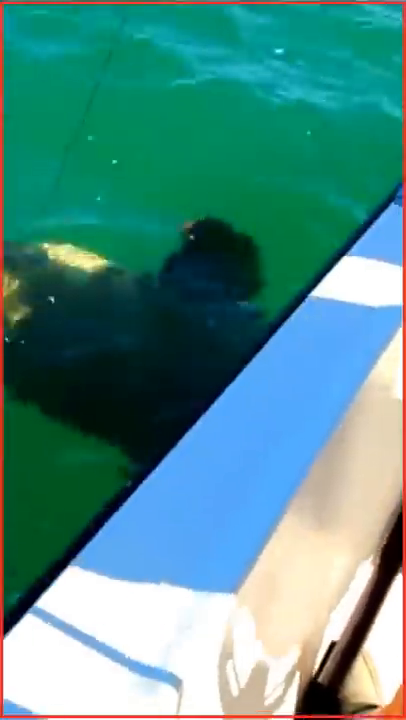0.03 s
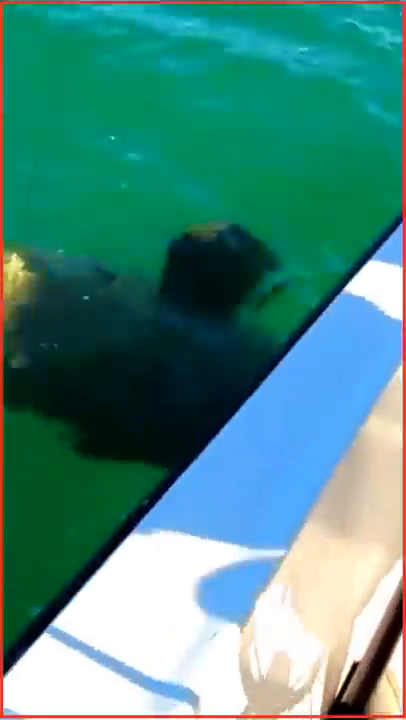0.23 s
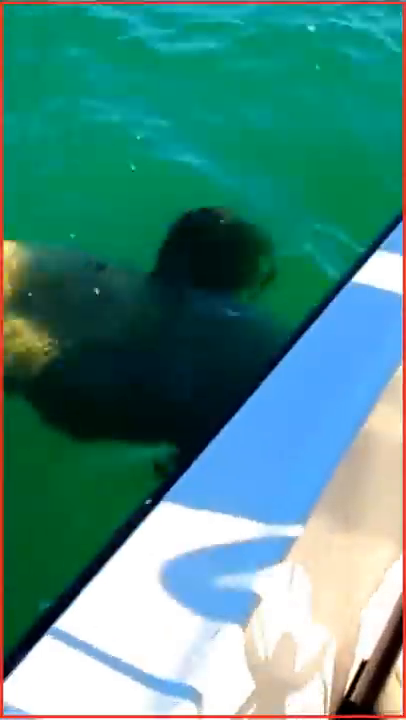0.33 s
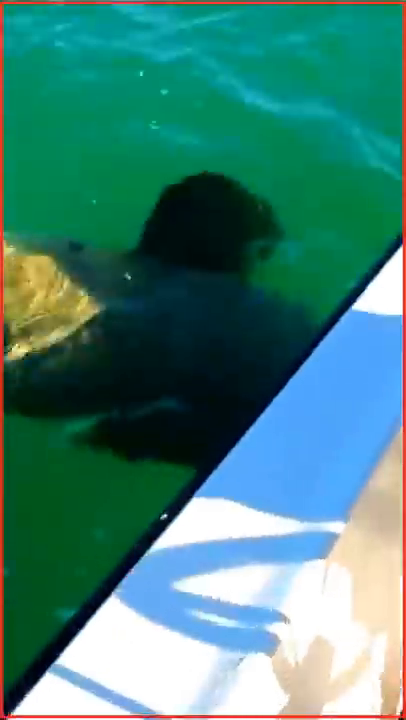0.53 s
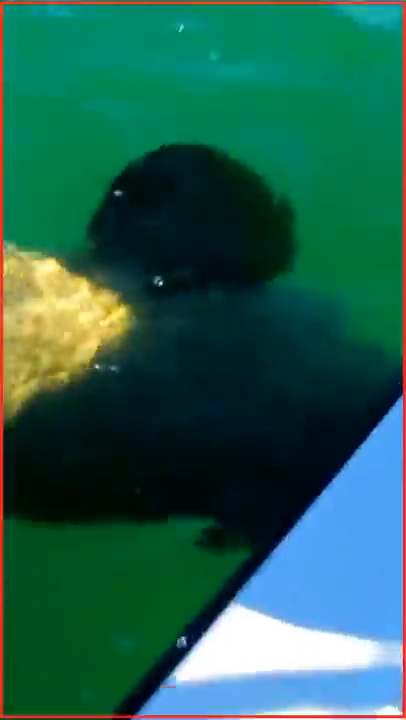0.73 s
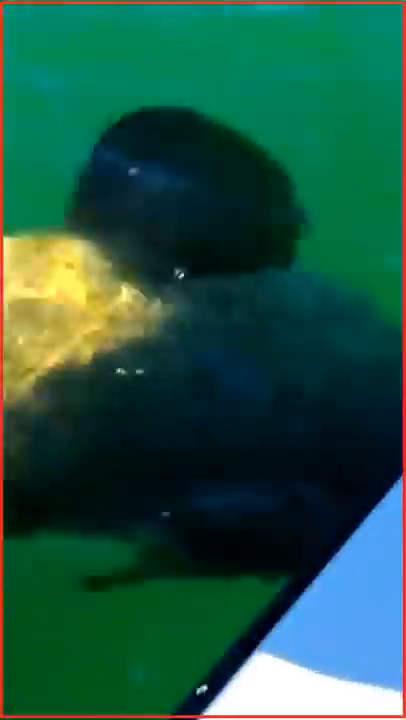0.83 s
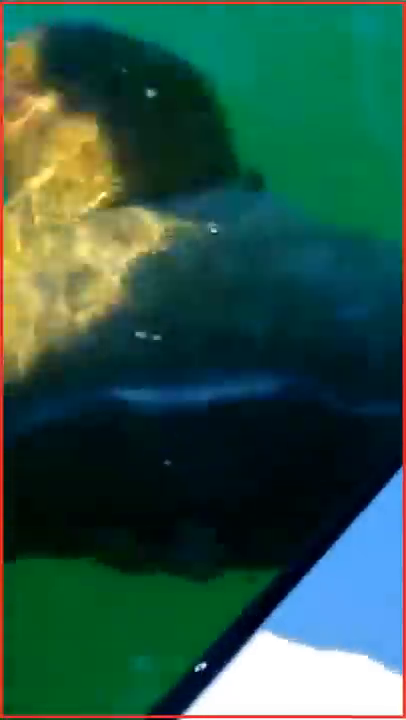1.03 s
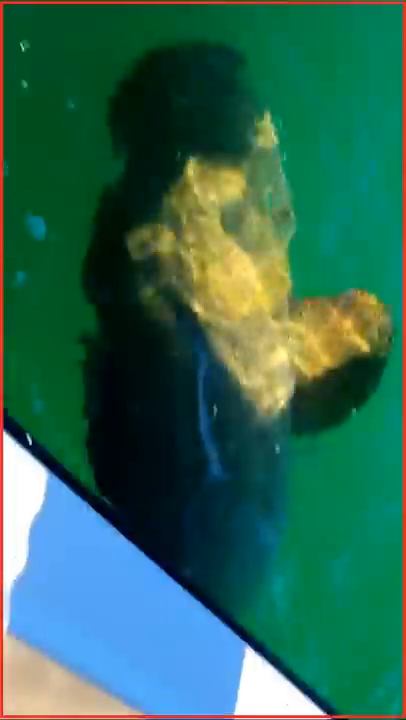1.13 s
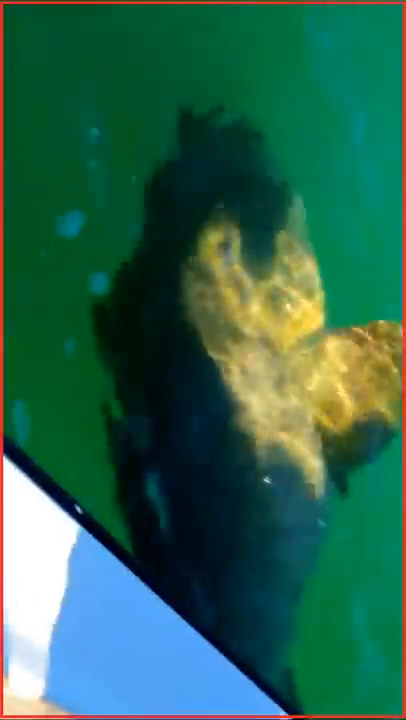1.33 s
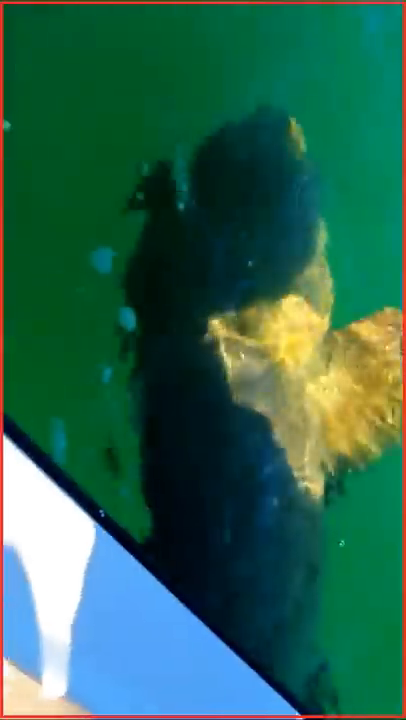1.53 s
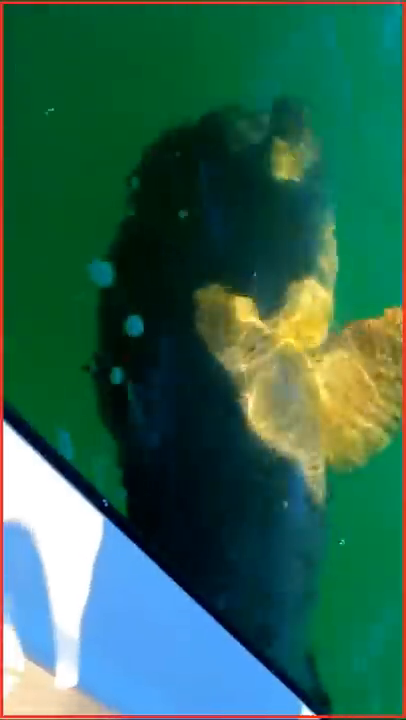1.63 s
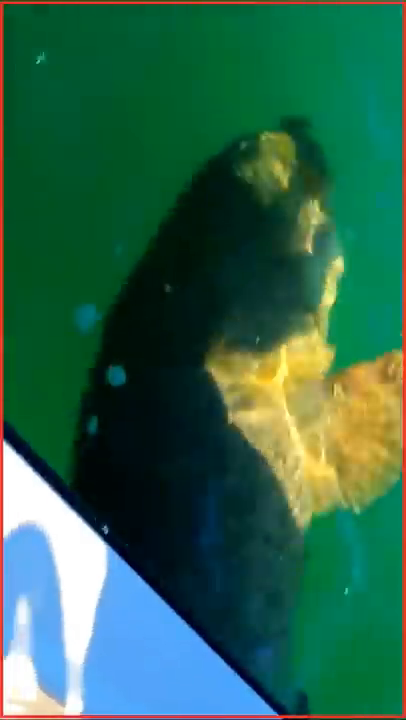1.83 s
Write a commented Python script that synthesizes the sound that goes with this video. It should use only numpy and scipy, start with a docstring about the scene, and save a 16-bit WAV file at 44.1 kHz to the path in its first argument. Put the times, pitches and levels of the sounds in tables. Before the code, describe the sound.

Two hard, hollow knocks hit a small boat's hull at about 0.25 and 0.4 seconds, loud and close, the second leaving a brief boom. Lighter bumps follow until 0.8 seconds. Faint ratchet-like ticks run from 0.1 to 0.9 seconds, slowing. After that come soft low thumps, quiet water laps around 1 to 1.2 seconds and a small click near 1.5, with low wind rumble on the microphone throughout.

```python
"""Two hard bumps boom through a small boat's hollow hull, and lighter bumps follow as the object settles.
Each impact excites the damped modes of the hull, its panels and the enclosed air. Something like a
ratchet ticks and slows, each tick reflected by the deck. Water laps, wind buffets the microphone,
and there are two small snaps. The two hard knocks just overload the recorder."""
import sys
import numpy as np
from scipy import signal
from scipy.fft import rfft, irfft
from scipy.io import wavfile

SR = 44100
rng = np.random.default_rng(int(sys.argv[2]) if len(sys.argv) > 2 else 0)


def store_pcm(level_fs):
    """Save levels as 16-bit WAV."""
    pcm = np.round(np.clip(level_fs, -1, 1) * 32767).astype(np.int16)
    wavfile.write(sys.argv[1], SR, np.atleast_2d(pcm).T)


N = 83790

# Spectrum of the water's wash: f/Hz, spectral level/dB
WASH_SPECTRUM = [(170, -19), (330, -2.5), (700, -1.5), (1400, -9), (2600, -15), (5000, -22), (16000, -33.5)]
# Envelope of the wash: t/s, level/dB
WASH_LEVEL = [(0, -47.5), (.7, -47), (1.2, -47.5), (1.35, -51), (1.45, -55.5), (1.66, -51), (1.9, -55)]
# Envelope of the water's narrow hiss: t/s, level/dB
HISS_LEVEL = [(0, -60.5), (.7, -73), (1.02, -52), (1.22, -50), (1.42, -70.5)]
# Laps and their fizz: t/s, level/dB, f/Hz, Gaussian width/s
LAPS = [(0.96, -42.5, 1830, 0.0043), (0.998, -34, 266, 0.0095), (1.155, -35.5, 610, 0.015),
        (1.164, -40, 860, 0.0087), (1.177, -38.5, 330, 0.014), (1.331, -58.5, 11300, .012),
        (1.736, -44, 1280, 0.003)]
# Spectrum of wind on the microphone: f/Hz, spectral level/dB
WIND_SPECTRUM = [(20, -5), (110, -1), (200, -5.5), (400, -13.5), (3000, -110)]
# Envelope of the wind: t/s, level/dB
WIND_LEVEL = [(0, -43.5), (.17, -55), (.5, -39.5), (.8, -51.5), (1.1, -39), (1.45, -50.5), (1.9, -54)]
# Wind buffets and soft shoves on the hull: t/s, level/dB, f/Hz, Gaussian width/s
THUMPS = [(0.07, -35, 62, 0.01), (.259, -16.5, 147, 0.0074), (.301, -29.5, 174, 0.01),
          (0.993, -23, 190, 0.0015), (1.004, -29, 171, 0.0074), (1.07, -36, 94, 0.013),
          (1.142, -35.5, 195, 0.0079), (1.18, -37.5, 83.4, 0.019), (1.335, -28, 86, 0.0022),
          (1.539, -34, 116, 0.006), (1.57, -32, 126, 0.0072), (1.712, -38, 109, 0.0038),
          (1.787, -32.5, 142, 0.0035)]
# Small hard clicks: t/s, level/dB
SNAPS = [(1.095, -47.5), (1.471, -35.5)]
# Modes of a snap: f/Hz, level/dB, time constant/s
SNAP_MODES = [(2360, -6, 0.0034), (7470, 3, 0.0015), (10000, 5.5, 0.00071), (14400, -3, 0.0012)]
# Ratchet ticks: t/s, level/dB
TICKS = [(0.11, -29), (0.1526, -29.5), (0.196, -32), (0.2255, -38), (0.3007, -34.5), (0.3284, -33.5),
         (0.3532, -30.5), (.446, -34), (0.4943, -30.5), (0.5285, -30), (0.6882, -34), (0.7558, -33.5),
         (0.8039, -32), (0.8640, -36.5)]
# Spectrum of a tick: f/Hz, spectral level/dB
TICK_SPECTRUM = [(500, -17), (1800, -10.5), (3100, 0), (4300, -7.5), (5800, -3.5), (8500, -10),
                 (10500, -17), (16000, -21)]
# Direct and reflected paths of a tick: delay/s, level/dB
TICK_PATHS = [(0, -4.5), (.0048, -11), (.009, -13), (0.013, -13.5)]
# Hull modes: f/Hz, level struck at spot 0/dB, level struck at spot 1/dB
HULL_MODES = [(124, -11.5, -40), (172.6, -7.5, -19), (198.2, -7.5, 2), (231, -1.5, -12),
              (291.6, -16, -11.5), (350, -7.5, -11), (427.7, -13, -13.5), (512.3, -13, -14.5),
              (560, -13.5, -27), (732, -22.5, -20), (974, -14, -13.5), (1130, -10.5, -36),
              (1374, -14, -18.5), (1787, -55, -19), (1954, -26, -20.5), (2506, -21, -24),
              (2712, -44, -20.5), (2950, -31, -23)]
# Dense ring of the panels: f/Hz, spectral level/dB, T60/s
PANEL_BANDS = [(109, -39, 0.091), (259, 5, 0.11), (530, -0.5, 0.11), (960, -1, 0.065), (1590, -11, 0.083),
               (2600, -12.5, 0.059), (4370, -24, 0.1), (7350, -30.5, 0.11), (15000, -25, 0.047)]
# Lingering resonances of the hull: f/Hz, bandwidth/Hz, level/dB
LINGERING_BANDS = [(129, 15, -6), (276, 45, 0.5), (395, 42, -3.5), (640, 1080, -9)]
# Blows and rebounds: t/s, level/dB, spot (0 to 1), contact cut-off/Hz, crack and panel gain/dB
KNOCKS = [(0.2340, 0.5, 0.066, 7300, -1.5), (0.2458, -25, 0.66, 14400, 15.5), (0.3872, 0, 0.92, 9800, -0.5),
          (0.403, -19, 0.83, 8300, 9.5), (0.488, -25.5, 0.6, 3000, 6), (0.545, -26, 0.68, 2560, 7),
          (0.595, -33, 0.78, 12500, 12), (0.7045, -15, 0.88, 280, -2.5), (0.7714, -18.5, 1, 2300, 2.5)]


def undb(db):
    """Amplitude ratio for a level in decibels."""
    return 10 ** (np.asarray(db) / 20)


def since(start):
    """Time elapsed since an onset, zero before it."""
    return np.maximum(np.arange(N) / SR - start, 0)


def fade(t, t60):
    """Exponential decay, 60 dB in t60 seconds."""
    return np.exp(-np.log(1000) * t / t60)


def burst(t, rise):
    """Critically damped pulse, peaking at 1 when t = rise."""
    return t / rise * np.exp(1 - t / rise)


def swell(centre, width):
    """Gaussian envelope in time."""
    return np.exp(-.5 * ((since(0) - centre) / width) ** 2)


def envelope(rows):
    """Gain interpolated through rows of t/s, level/dB."""
    return undb(np.interp(since(0), *np.array(rows).T))


def on_bins(hz, values):
    """Interpolation in log frequency onto every spectral bin."""
    return np.interp(np.log(np.fft.rfftfreq(N, 1 / SR) + 1), np.log(hz), values)


def noise(gain):
    """White noise filtered by a gain per bin, scaled to unit variance."""
    x = irfft(rfft(rng.standard_normal(N)) * gain, N)
    return x / x.std()


def coloured(rows):
    """Unit noise shaped by rows of f/Hz, level/dB."""
    return noise(undb(on_bins(*np.array(rows).T)))


def resonant(hz, width):
    """Unit noise in one steep-sided resonance."""
    f = np.fft.rfftfreq(N, 1 / SR) + 1
    return noise(1 / (1 + ((f * f - hz * hz) / (f * width)) ** 2))


def wander(rate_hz):
    """Smooth random modulation: low-passed unit noise."""
    return noise(np.exp(-(np.fft.rfftfreq(N, 1 / SR) / rate_hz) ** 2))


def split(x, centres):
    """Complementary filter bank: overlapping bands that sum to the input."""
    spectrum = rfft(x)
    return [irfft(spectrum * on_bins(centres, one), N) for one in np.eye(len(centres))]


def water(flicker_db=2, lap_bandwidth_ratio=0.56):
    """Amplitude-modulated noise bands: a flickering wash, laps against the side and a narrow hiss."""
    octaves = 250 * 2 ** np.arange(6)
    wash = sum(band * undb(flicker_db * wander(52) * min(1, 2000 / hz))
               for hz, band in zip(octaves, split(coloured(WASH_SPECTRUM), octaves)))
    laps = sum(undb(db) * resonant(hz, lap_bandwidth_ratio * hz) * swell(centre, width)
               for centre, db, hz, width in LAPS)
    hiss = resonant(hz=2176, width=370) * envelope(HISS_LEVEL)
    return wash * envelope(WASH_LEVEL) + laps + hiss


def wind(gust_db=2):
    """Turbulent pressure on the microphone gives an unsteady low rumble."""
    return coloured(WIND_SPECTRUM) * envelope(WIND_LEVEL) * undb(gust_db * wander(29))


def thumps(pitch_spread=0.22):
    """Wind buffets and soft shoves on the hull are short, low wave packets of wandering frequency."""
    out = 0
    for centre, db, hz, width in THUMPS:
        cycles = np.cumsum(hz * (1 + pitch_spread * wander(hz))) / SR
        cycles -= np.interp(centre, since(0), cycles)  # zero crossing at the envelope's peak
        out += undb(db) * np.sqrt(2) * np.sin(2 * np.pi * cycles) * swell(centre, width)
    return out


def snaps(tail_db=-3.5, tail_s=0.0075):
    """Impulse response of a few high, heavily damped modes, with a short tail of noise."""
    out = 0
    for start, snap_db in SNAPS:
        t = since(start)
        ring = sum(undb(db) * np.sin(2 * np.pi * hz * t) * np.exp(-t / decay)
                   for hz, db, decay in SNAP_MODES)
        tail = undb(tail_db) * rng.standard_normal(N) * np.exp(-t / tail_s)
        out += undb(snap_db) * (ring + tail) * (t > 0)
    return out


def ratchet(gain_db=2.5, rise_s=0.00031, smear=0.041, scatter_db=-18.5, scatter_s=0.017):
    """Incoherent addition: each tick, its reflections off deck and sides, and its scatter sum in power."""
    power = 0
    for start, db in TICKS:
        t = since(start)
        paths = sum((undb(path_db) * burst(since(start + lag), rise_s + smear * lag)) ** 2
                    for lag, path_db in TICK_PATHS)  # later arrivals are more spread out
        scatter = undb(scatter_db) ** 2 * np.exp(-2 * t / scatter_s) * (t > 0)
        power += undb(db) ** 2 * (paths + scatter)
    return undb(gain_db) * np.sqrt(power) * coloured(TICK_SPECTRUM)


def hull_modes(t, spot, gain_db=-1, ref_hz=210, ref_t60_s=0.089, damping_exponent=0.16):
    """Modal superposition: the spot struck weights each mode, and higher modes decay sooner."""
    out = 0
    for k, (hz, db0, db1) in enumerate(HULL_MODES):
        amplitude = (-1) ** k * undb(db0 + spot * (db1 - db0))
        t60 = ref_t60_s * (ref_hz / hz) ** damping_exponent
        out += amplitude * np.sin(2 * np.pi * hz * t) * fade(t, t60)
    return undb(gain_db) * out


def panel_ring(t, gain_db=-9):
    """Modal overlap: the panels' crowded modes merge into noise that decays band by band."""
    rows = np.array(PANEL_BANDS)
    bands = split(coloured(rows[:, :2]), rows[:, 0])
    return undb(gain_db) * sum(band * fade(t, t60) for band, t60 in zip(bands, rows[:, 2]))


def cavity_boom(t, contact_hz, gain_db=-8, hz=210, t60_s=0.53, softness_exponent=0.43):
    """Cavity resonance of the air in the hull, which a slow, soft contact drives more strongly."""
    drive = (hz / contact_hz) ** softness_exponent
    return undb(gain_db) * drive * np.sin(2 * np.pi * hz * t) * fade(t, t60_s)


def lingering_ring(t, blow_db, gain_db=-21.5, extra_db_per_db=0.47, t60_s=0.36):
    """Nonlinear excitation: hard blows stir disproportionately more of the lingering resonances."""
    ring = sum(undb(db) * resonant(hz, width) for hz, width, db in LINGERING_BANDS)
    return undb(gain_db + extra_db_per_db * blow_db) * ring * fade(t, t60_s)


def hull_knocks(build_s=0.0015, spot0_hollow_db=-27.5, crack_db=-15.5, radiation_hz=102):
    """Impact excitation: each blow cracks and rings the hull; finite contact time acts as a low-pass."""
    out = 0
    for start, db, spot, contact_hz, bright_db in KNOCKS:
        t = since(start)
        build_up = 1 - np.exp(-(t / build_s) ** 2)
        shell = hull_modes(t, spot) + undb(bright_db) * panel_ring(t)
        hollow = cavity_boom(t, contact_hz) + lingering_ring(t, db)
        hollow *= undb(spot0_hollow_db * (1 - spot))
        crack = undb(crack_db + bright_db) * resonant(hz=2730, width=3400) * burst(t, rise=0.00082)
        blow = build_up * (shell + hollow) + crack
        pole = np.exp(-2 * np.pi * contact_hz / SR)
        out += undb(db) * signal.lfilter([(1 - pole) ** 2], [1, -2 * pole, pole ** 2], blow)
    # The hull radiates long wavelengths poorly.
    return signal.sosfilt(signal.butter(2, radiation_hz, "highpass", fs=SR, output="sos"), out)


def scene(mic_hiss_db=-64.5):
    """Superposition of all sources at one microphone above the deck, with its faint self-noise."""
    sources = hull_knocks() + ratchet() + snaps() + wind() + thumps() + water()
    return (sources + undb(mic_hiss_db) * rng.standard_normal(N))[None]


def record(dry, knee_exponent=10, top_hz=16000):
    """Saturation flattens the highest peaks, and a steep low-pass limits the bandwidth."""
    clipped = dry / (1 + np.abs(dry) ** knee_exponent) ** (1 / knee_exponent)
    return signal.sosfilt(signal.ellip(8, .2, 70, top_hz, fs=SR, output="sos"), clipped)


dry = scene()
out = record(dry)
store_pcm(out)
```